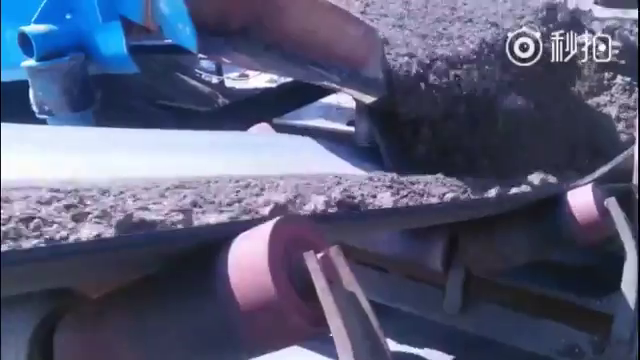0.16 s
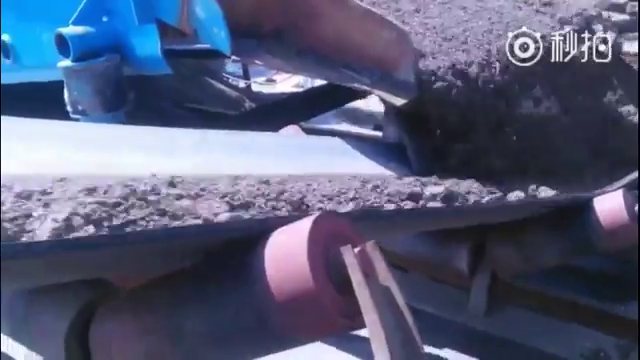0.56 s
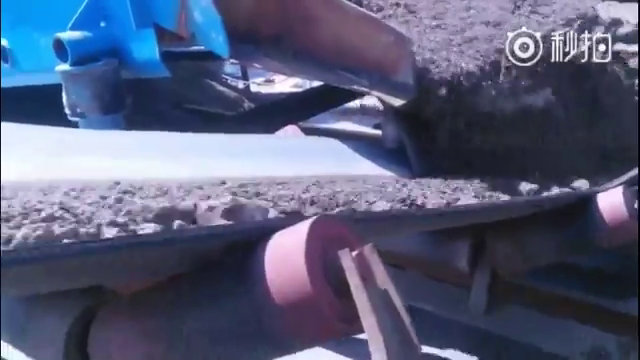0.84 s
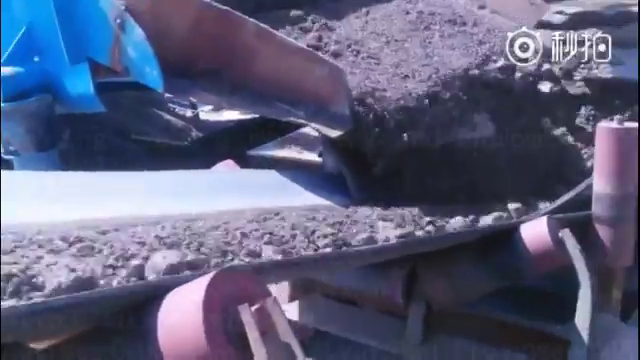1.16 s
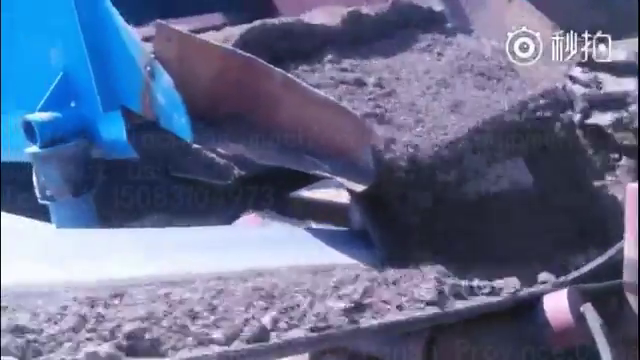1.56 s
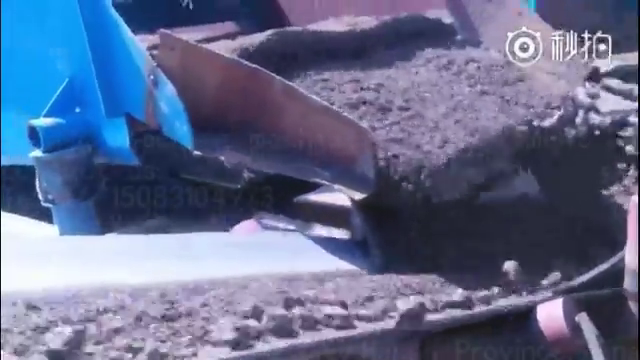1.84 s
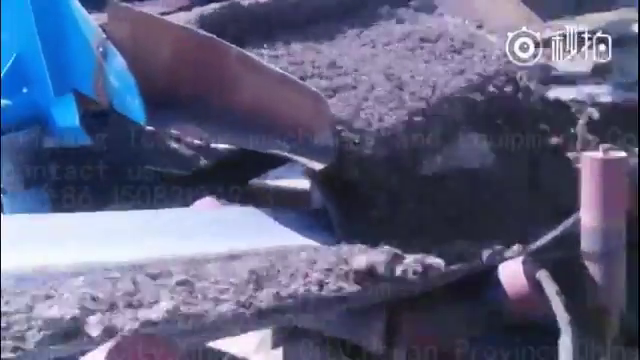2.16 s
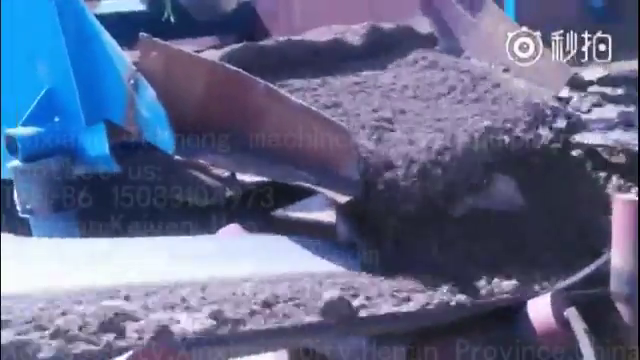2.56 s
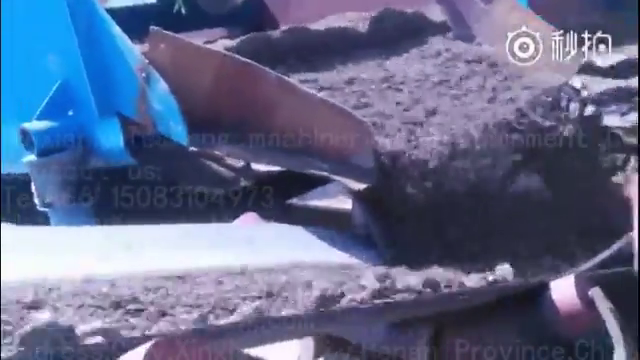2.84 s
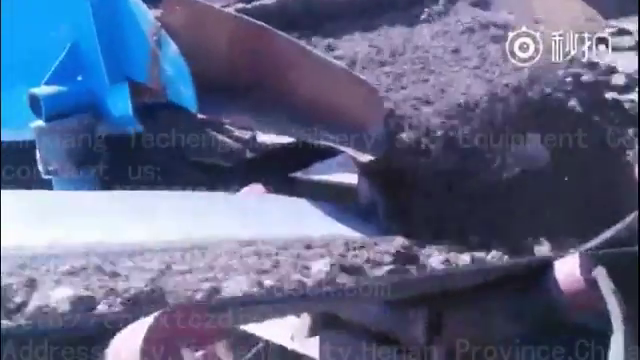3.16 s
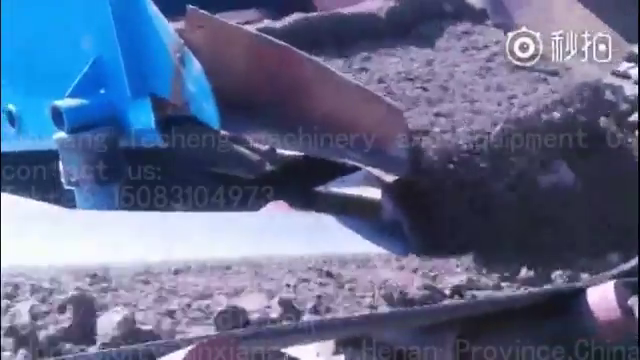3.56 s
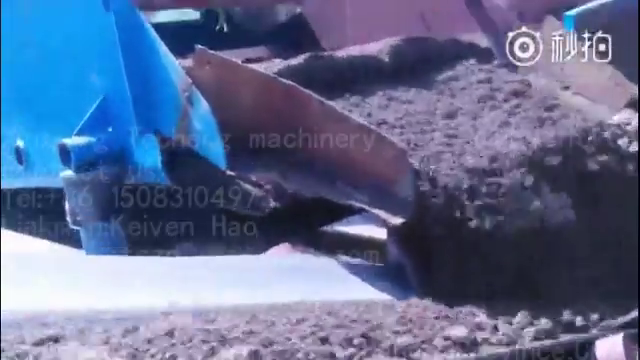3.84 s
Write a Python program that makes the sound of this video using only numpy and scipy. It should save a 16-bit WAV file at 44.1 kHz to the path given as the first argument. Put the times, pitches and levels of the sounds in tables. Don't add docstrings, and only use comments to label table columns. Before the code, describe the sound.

A vibrating screen sorting crushed stone roars outdoors. Silence until about 0.4 s, then the full noise cuts in abruptly and holds to 4 s. Hollow steel roar dominates, over deep frame rumble, dense stone hiss and fine clacks pulsing about seventeen times a second. A low shaft throb swells and fades; motors hum faintly. Colour shifts as the camera turns; load thins slightly near 3.2 s. Close, mono, compressed microphone.

```python
import sys
import numpy as np
from scipy import signal
from scipy.fft import rfft, irfft, next_fast_len
from scipy.io import wavfile
from scipy.ndimage import uniform_filter1d, map_coordinates

SR = 44100
rng = np.random.default_rng(int(sys.argv[2]) if len(sys.argv) > 2 else 0)


def gain_from_db(level_db):
    decades = np.asarray(level_db, float) / 20
    return 10 ** decades


def pcm_store(signal):
    levels = np.round(np.clip(np.atleast_2d(signal), -1, 1) * 32767)
    wavfile.write(sys.argv[1], SR, levels.astype(np.int16).T)


N = 176400
SHAKE_HZ = 16.557

# (frequency [Hz], level [dB per Hz])
DECK_COLOUR = [(290, -25.5), (510, -15.5), (580, -3), (730, -2), (1000, -7), (1700, -5), (2600, -7.5),
               (4000, -17.5), (5200, -25.5), (8800, -120)]
# (time [s], low centre [Hz], low boost [dB], high centre [Hz], high boost [dB])
CHUTE_RESONANCES = [(.4, 1420, 3.5, 2800, 0), (.75, 1410, 3.5, 2140, 4), (1.3, 1410, 3.5, 2070, 6),
                    (1.85, 1104, 5.5, 1980, 4), (2.3, 1480, 3, 2045, 3.5), (2.8, 1420, 1, 1750, 1.5),
                    (3.3, 1234, 4, 1630, 2), (3.65, 1195, 5, 2100, 0.5), (4, 1170, 2, 2180, 1.5)]
# (frequency [Hz], level [dB per Hz])
FRAME_COLOUR = [(18, -29), (40, -16.5), (70, -7.5), (105, -6), (160, -2.5), (289, -2.5), (470, -9.5),
                (560, -10.5), (730, -35), (1230, -120)]
# (frequency [Hz], level [dB per Hz])
STONES_FACING_COLOUR = [(1880, -27), (3200, -6), (3460, -6.5), (4710, -8.5), (5590, -12), (7650, -14),
                        (9070, -8), (9630, -6.5), (12500, -41.5), (21200, -120)]
# (frequency [Hz], level [dB per Hz])
STONES_TURNED_COLOUR = [(1880, -25), (3200, -4), (6750, -10.5), (9240, -11.5), (9630, -8), (12500, -39.5),
                        (21200, -120)]
# (time [s], load [dB], camera turned [0-1])
LOAD_AND_TURN = [
    (.4, 0.5, 0.05),
    (1.1, 0.4, 0.44),
    (1.5, 0, 0.5),
    (2.1, 0.5, 0.5),
    (2.5, 0.34, 0.9),
    (3.2, 0.1, 0.9),
    (4, 0.5, 0.8),
]
# (multiple of the shake [-], level [dB], quietest moment [s],
# time between quiet moments [s], depth of the swell [0-1])
SHAFT_ORDERS = [(3, -24.8, -.25, 5.6, .9), (4, -22, 1.15, 3.3, .8), (5, -28.5, 2.6, 2.9, .97),
                (6, -29.5, 2.4, 2.1, .95), (7, -35, 2, 3, .5), (8, -32, 2.5, 2.5, .4), (9, -33, 1.2, 2, .5),
                (10, -38, 1, 1.5, .6), (15, -38, 1, 2, .5)]
# (frequency [Hz], level [dB], width [Hz])
GEAR_TONES = [(223.2, -37, 9.5), (276, -36.5, 8.1), (382, -38, 18), (572, -35.5, 9.2), (720, -33.5, 2.4),
              (1003, -39, 8), (3437, -43.5, 12)]


def unit(x):
    return x / np.sqrt(np.mean(x ** 2) + 1e-20)


def wobble(rate):
    knots = rng.standard_normal(int(N * rate / SR) + 4)
    return map_coordinates(knots, [np.arange(N) * rate / SR])


def filtered(x, response):
    m = next_fast_len(N + 8192)
    return irfft(rfft(x, m) * response(np.fft.rfftfreq(m, 1 / SR)), m)[..., :N]


def coloured(x, points):
    f, db = np.transpose(points)
    return unit(filtered(x, lambda hz: gain_from_db(np.interp(np.log(hz + 1), np.log(f + 1), db))))


def smooth_field(shape, bins, frames):
    field = uniform_filter1d(rng.standard_normal(shape), bins, axis=0)
    return unit(uniform_filter1d(field, frames, axis=1))


def chute_boost_db(hz, t):
    s, *columns = np.transpose(CHUTE_RESONANCES)
    low_hz, low_db, high_hz, high_db = [np.interp(t, s, c) for c in columns]

    def bell(centre, width):
        return np.exp(-.5 * ((hz[:, None] - centre) / width) ** 2)

    return low_db * bell(low_hz, 150) + high_db * bell(high_hz, 160)


def patchy(patchy_db, size, chute=False):
    hz, t, z = signal.stft(rng.standard_normal(N), SR, nperseg=512)
    gain_db = patchy_db * smooth_field(z.shape, *size)
    if chute:
        gain_db = gain_db + chute_boost_db(hz, t)
    return unit(signal.istft(z * gain_from_db(gain_db), nperseg=512)[1][:N])


def deck_roar(load_db, throw):
    roar = coloured(patchy(.5, size=(2, 10), chute=True), DECK_COLOUR)
    return gain_from_db(-15.5 + load_db) * (1 + .034 * throw) * roar


def frame_rumble(load_db):
    level_db = -21 + .6 * load_db + .4 * wobble(5.15)
    return gain_from_db(level_db) * coloured(patchy(0.7, size=(3, 16)), FRAME_COLOUR)


def clatter():
    grains_per_s, centre_hz, cycles, spread_db = 1200, 5170, 3, 2
    when, pitch, strength = rng.random((3, int(grains_per_s * N / SR), 1))
    hz = np.clip(centre_hz * np.exp(1.67 * (pitch - .5)), 500, 12000)
    turns = np.arange(96) / SR * hz
    ring = np.sin(2 * np.pi * turns) * np.exp(-3 * turns / cycles)
    grains = gain_from_db(-spread_db * np.log(strength + 1e-4)) * ring
    at = (when * N).astype(int) + np.arange(96)
    return unit(np.bincount(at.ravel(), grains.ravel(), N + 96)[:N])


def stone_fizz(load_db, throw, turned):
    grain_share = 0.092
    rattle = np.sqrt(1 - grain_share) * patchy(0.71, size=(5, 8)) + np.sqrt(grain_share) * clatter()
    facing = coloured(rattle, STONES_FACING_COLOUR)
    away = coloured(rattle, STONES_TURNED_COLOUR)
    fizz = (1 - turned) * facing + turned * away
    level_db = -27 + 1.08 * load_db + 0.65 * wobble(6.55) + 0.69 * wobble(13)
    return gain_from_db(level_db) * (1 + .076 * throw) * fizz


def screen():
    t = np.arange(N) / SR
    s, load, turn = np.transpose(LOAD_AND_TURN)
    load_db = np.interp(t, s, load) + .25 * wobble(8) + .3 * wobble(15)
    turned = np.interp(t, s, turn)
    throw = np.cos(2 * np.pi * (SHAKE_HZ * t - 0.25) + 0.32 * wobble(2.2))
    return deck_roar(load_db, throw) + frame_rumble(load_db) + stone_fizz(load_db, throw, turned)


def shaker():
    first_thump_s, smear_rad = .0375, .68
    t, out = np.arange(N) / SR, np.zeros(N)
    for k, db, quiet_s, span_s, depth in SHAFT_ORDERS:
        slide = np.sin(np.pi * (t - quiet_s) / span_s) * depth + 1j * (1 - depth)
        phase = 2 * np.pi * k * SHAKE_HZ * (t - first_thump_s) + smear_rad * (k - 3) * (k - 4)
        unsteady = gain_from_db(.6 * wobble(3)) * np.exp(.08j * wobble(3))
        out += np.sqrt(2) * gain_from_db(db) * np.real(slide * unsteady * np.exp(1j * phase))
    return out


def motors():
    out = np.zeros(N)
    for hz, db, width in GEAR_TONES:
        tone = filtered(rng.standard_normal(N), lambda f: 1 / (1 + (2 * (f - hz) / width) ** 2))
        out += gain_from_db(db) * unit(tone)
    return out


def scene():
    return (screen() + shaker() + motors())[None]


def soft_ceiling(x):
    ceiling, knee = .72, 4.5
    return x / (1 + np.abs(x / ceiling) ** knee) ** (1 / knee)


def streaked(x):
    hz, _, z = signal.stft(x, SR, nperseg=1024)
    streaks = unit(uniform_filter1d(rng.standard_normal(z.shape), size=3, axis=-1))
    patches = smooth_field(z.shape[-2:], 3, 5)
    weak = ((hz > 5200) * (hz < 8500))[:, None]
    keep = 1 - weak / (1 + np.exp(-14 * (patches - 2.1)))
    gain = gain_from_db(2.4 * streaks * (hz[:, None] > 800))
    return signal.istft(z * keep * gain, SR, nperseg=1024)[1][..., :N]


def ghost_hiss():
    def band(low, high):
        return unit(filtered(rng.standard_normal(N), lambda f: (f > low) * (f < high) * (f / SR) ** 8))

    ragged = uniform_filter1d(1. * (wobble(30) > .2), size=200)
    hiss = band(12300, 13650) + 0.33 * band(11600, 12300) * ragged
    return gain_from_db(-69 + 1.2 * wobble(25)) * hiss


def band_limit(x):
    return signal.sosfilt(signal.butter(12, 13550, fs=SR, output="sos"), x)


def record(dry):
    start_s, fade_s, top_hz = .3932, 0.00046, 9608
    x = streaked(soft_ceiling(dry))
    gate = np.clip((np.arange(N) / SR - start_s) / fade_s, 0, 1)
    x = filtered(x * gate, lambda f: 1 / (1 + (f / top_hz) ** 300))
    return band_limit(x + gate * ghost_hiss())


dry = scene()
out = record(dry)
pcm_store(out)
```